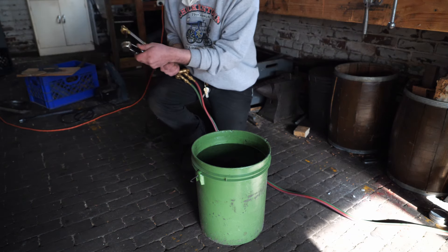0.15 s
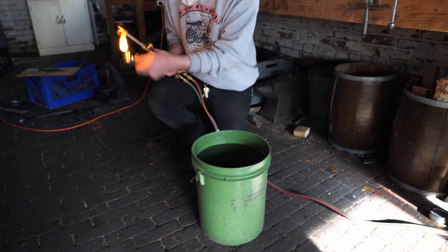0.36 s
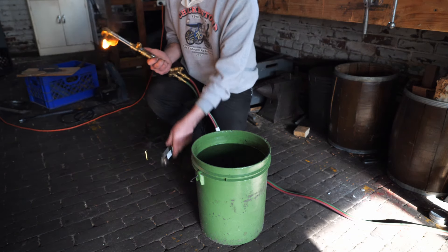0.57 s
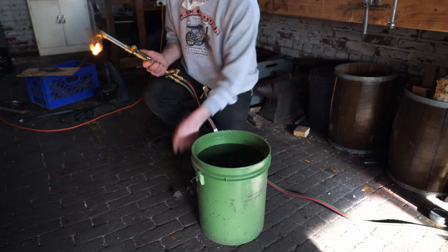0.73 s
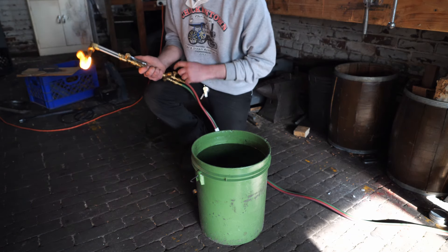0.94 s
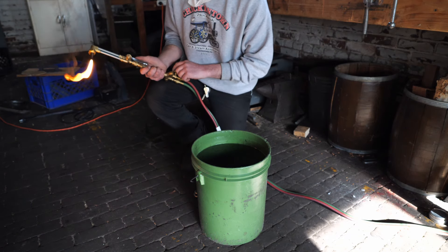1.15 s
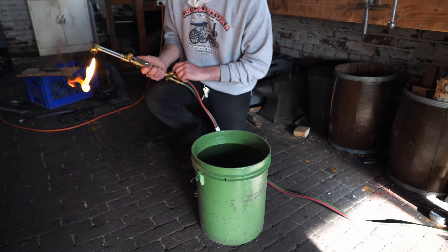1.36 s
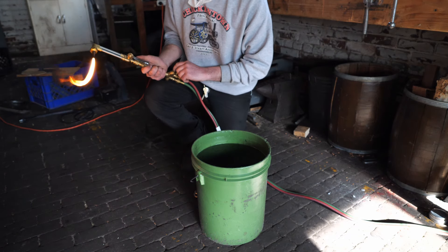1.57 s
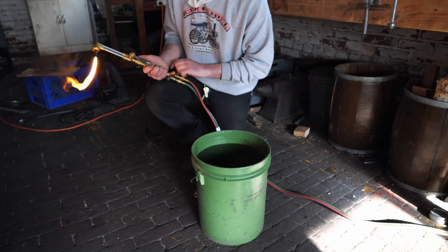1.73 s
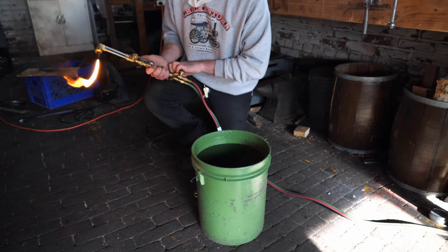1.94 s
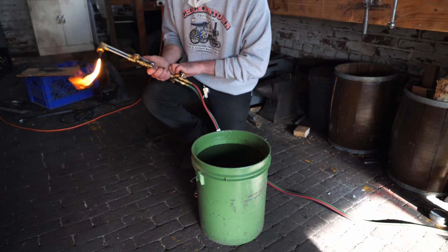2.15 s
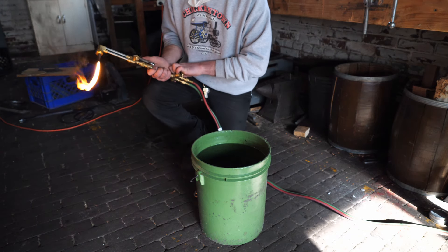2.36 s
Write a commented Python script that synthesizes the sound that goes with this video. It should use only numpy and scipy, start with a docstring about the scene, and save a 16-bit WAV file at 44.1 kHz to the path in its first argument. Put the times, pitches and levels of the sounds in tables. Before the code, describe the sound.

A gas torch lights with one loud, deep pop at about 0.23 seconds, just after a tiny striker scrape, overloading slightly and booming through a brick workshop for over half a second. Small metallic clicks follow near 0.45. At 0.77 the steel striker hits the paving, skids and clatters until about 1.2. Low room hum remains, with a faint short tone near 1.9 and a slight hiss around 2.1.

```python
"""Over a low room hum a spark striker scrapes, then torch gas catches with a deep pop that fills a brick workshop.
The striker clicks, is tossed away, lands on the paving and clatters; the small flame hisses faintly.
Pop: one pressure swing and a noise snap. Striker: ticks and rattles coloured by steel modes.
Walls: decaying stereo noise. Hiss, whistles and hum: shaped noise, plus one clear tone.
The recorder's limiter holds the loudest moments down."""
import sys
import numpy as np
from scipy import signal
from scipy.fft import rfft, irfft
from scipy.io import wavfile

SR = 44100
rng = np.random.default_rng(int(sys.argv[2]) if len(sys.argv) > 2 else 0)


def waveform_to_disk(signal):
    """Save audio, clipped to [-1, 1], as 16-bit WAV at the path in sys.argv[1]."""
    frames = np.transpose(np.atleast_2d(signal))
    scaled = np.clip(frames, -1, 1) * 32767
    samples = np.round(scaled).astype(np.int16)
    wavfile.write(sys.argv[1], SR, samples)


N = 105840
T = np.arange(N) / SR


def amp(db):
    """Level in dB to linear gain."""
    return 10 ** (np.asarray(db) / 20)


def rms_one(x):
    """Scales to RMS 1 over all channels."""
    return x / np.sqrt(np.mean(x ** 2) + 1e-20)


def at_hz(points, hz):
    """Interpolates column 2 of a table over log frequency."""
    points = np.array(points)
    return np.interp(np.log(hz), np.log(points[:, 0]), points[:, 1])


def bin_hz(size):
    """Frequencies of the FFT bins, DC raised to 1 Hz for the log."""
    return np.maximum(np.arange(size // 2 + 1) * SR / size, 1)


def shape(x, spectrum):
    """Filters by a table of dB over Hz, minimum phase so that nothing sounds early."""
    size = x.shape[-1]
    cepstrum = irfft(np.log(amp(at_hz(spectrum, bin_hz(size)))), size)
    # fold the cepstrum onto positive time
    cepstrum[1:size // 2] *= 2
    cepstrum[size // 2 + 1:] = 0
    return irfft(rfft(x) * np.exp(rfft(cepstrum)), size)


def bandpass(x, low_hz, high_hz):
    """Butterworth band filter."""
    return signal.sosfilt(signal.butter(2, [low_hz, high_hz], "band", fs=SR, output="sos"), x)


def stereo_noise(size, likeness):
    """White noise in two channels whose likeness depends on frequency."""
    mid, side = rfft(rng.standard_normal((2, size)))
    alike = np.clip(at_hz(likeness, bin_hz(size)), 0, 1)
    common = np.sqrt(1 + alike) * mid
    opposed = np.sqrt(1 - alike) * side * [[1], [-1]]
    return irfft((common + opposed) / np.sqrt(2), size)


def ring(clicks, hz, t60_s):
    """Two-pole resonator: a unit click sets a sine of height 1 ringing."""
    r = amp(-60 / (t60_s * SR))
    w = 2 * np.pi * hz / SR
    return signal.lfilter([0, np.sin(w)], [1, -2 * r * np.cos(w), r * r], clicks + 1e-18)


POP_S, POP_DB, POP_HZ, POP_SWELL_S = .2344, 3.5, 219, 0.0033
SNAP_S, SNAP_DB, SNAP_LENGTH_S = .2364, -8.5, 0.00019


def pop():
    """The catching gas gives one swelling and dying pressure swing; the flame front snaps."""
    t = np.maximum(T - POP_S, 0)
    swell = t / POP_SWELL_S * np.exp(1 - t / POP_SWELL_S)
    swing = amp(POP_DB) * np.sin(2 * np.pi * POP_HZ * t) * swell
    noise = signal.lfilter([1], [1, -.5], rng.standard_normal(N))
    snap = amp(SNAP_DB) * noise * np.exp(-((T - SNAP_S) / SNAP_LENGTH_S) ** 2)
    return swing + snap


# spectrum of the burning gas: f/Hz, relative level/dB per Hz
BURN_SPECTRUM = [(30, -63), (60, -59.5), (100, -12), (190, 0), (300, -4), (400, -8), (520, -5.5),
                 (640, -10.5), (760, -23.5), (1100, -18.5), (1280, -24.5), (1470, -16.5), (1620, -27),
                 (1850, -29.5), (2300, -17), (2750, -27), (3500, -46), (4350, -28), (5200, -40.5),
                 (7500, -40), (15000, -56)]


def burn_burst():
    """The whole burst of burning as the walls receive it: a coloured click of energy 1."""
    click = 1. * (np.arange(N) == int(POP_S * SR))
    burst = shape(click, BURN_SPECTRUM)
    return burst / np.sqrt(np.sum(burst ** 2))


# striker contacts: t/s, rattle decay/s, relative level/dB in 0.8-2, 2-5.5, 5.5-9.5, 9.5-16 kHz
CONTACTS = [(.1987, .003, -60, -31, -49, -37.5), (.2143, 0.0063, -43.5, -30, -33, -35),
            (0.2309, 0.0049, -13.5, -15.5, -30.5, -34), (.4283, 0.0035, -53, -34, -17.5, -25.5),
            (0.4378, 0.0081, -54, -23.5, -26, -42), (.4636, 0.00035, -46, -12, -30, -4.5),
            (0.473, 0.00049, -46, -43, -48, -39), (.7655, 0.0018, -9.5, -10, -6, -19),
            (0.7716, 0.00092, -25, -32, -15, -28), (0.7796, 0.0013, -29, -30.5, -10, -9.5),
            (0.8335, 0.0062, -17.5, -12.5, -28, -16.5), (0.8774, 0.0011, -19.5, -40, -26, -40),
            (0.956, 0.0057, -31, -19, -57, -48), (1.1062, .012, -38, -24, -29, -33.5),
            (1.1901, 0.0029, -43, -49, -32.5, -45)]
# chatter while sliding: relative level/dB in the same four bands
SKID_BANDS_DB = (-34, -16.5, -20.5, -15)
SKID_S, SKID_LENGTH_S, SKID_FADE_S, SKID_HITS_PER_S = .833, 0.038, .03, 2900
TICK_LAG_S = .0008   # main tick after first touch
SHARP_S = .0015   # contacts that rattle longer have a weaker tick
RATTLE_DB = -5.5   # relative to a full tick


def contact_bands():
    """Each contact is a main tick and a dying rattle; the skid on the bricks is a longer chatter."""
    grains = rng.standard_normal(N) * np.exp(.5 * rng.standard_normal(N)) * (rng.random(N) < .3)
    bands = np.zeros((4, N))
    for start_s, decay_s, *bands_db in CONTACTS:
        decay = (T > start_s) * np.exp(-np.maximum(T - start_s, 0) / decay_s)
        contact = amp(RATTLE_DB) * grains * decay
        contact[int((start_s + TICK_LAG_S) * SR)] = min(1, np.sqrt(SHARP_S / decay_s))
        bands += amp(bands_db)[:, None] * contact
    chatter = rng.standard_normal(N) * (rng.random(N) < SKID_HITS_PER_S / SR)
    sliding = (T > SKID_S) * np.clip((SKID_S + SKID_LENGTH_S - T) / SKID_FADE_S, 0, 1)
    return bands + amp(SKID_BANDS_DB)[:, None] * chatter * sliding


# edges of the thud band and the four contact bands: f/Hz
BAND_EDGES_HZ = (200, 800, 2000, 5500, 9500, 16000)
# steel modes: f/Hz, level above the bare crack/dB, t60/s
STEEL_MODES = [(1220, 8.5, 0.004), (1758, 11.5, 0.043), (2167, 10, 0.022), (3050, 14.5, 0.01),
               (3723, 8.5, .012), (4680, 4.5, .01), (6490, 3.5, 0.012), (6770, 10.5, 0.0062),
               (7670, 15, 0.0035), (7800, 10.5, 0.0016), (8900, 12, 0.011), (11210, 12, 0.003),
               (11500, 4, 0.014), (12800, 5.5, .003), (14200, -4, .006)]
THUD_DB = -4   # drive under 800 Hz, relative to the next band


def striker():
    """Band-limited contacts drive the steel, whose modes are resonance peaks over a flat crack."""
    bands = contact_bands()
    bands = [bands[0] * amp(THUD_DB), *bands]
    drive = np.zeros(N)
    for k, (band, low_hz, high_hz) in enumerate(zip(bands, BAND_EDGES_HZ, BAND_EDGES_HZ[1:])):
        sign = (-1) ** k   # neighbours alternate so that they join without notches
        width_gain = np.sqrt(SR / (high_hz - low_hz)) / np.e
        drive += sign * width_gain * bandpass(band + 1e-18, low_hz, high_hz)
    grid_hz = np.geomspace(100, 20000, 2000)
    power = np.ones(len(grid_hz))
    for hz, db, t60_s in STEEL_MODES:
        power += amp(2 * db) / (1 + ((grid_hz - hz) * t60_s / 1.1) ** 2)
    return shape(drive, np.c_[grid_hz, 10 * np.log10(power)])


# decay time of the workshop: f/Hz, t60/s
ROOM_T60 = [(60, 0.42), (150, 0.7), (400, 0.66), (1000, 0.61), (3000, 0.62), (8000, 0.46), (15000, 0.27)]
# left-right likeness of the reverberation: f/Hz, likeness (0-1)
ROOM_LIKENESS = [(60, 0.99), (180, 1), (550, 0.99), (1650, 0.74), (4970, 0.85), (15000, 0.77)]
ROOM_GAP_S, ROOM_BUILD_S = 0.0019, 0.011


def workshop():
    """Impulse response: noise that builds up after a gap and dies band by band; mean channel energy 1."""
    t = T[:SR]
    edges_hz = 46 * 2 ** np.arange(0, 9, .5)
    white = [stereo_noise(SR, ROOM_LIKENESS) for _ in range(2)]
    response = np.zeros((2, SR))
    for k, (low_hz, high_hz) in enumerate(zip(edges_hz, edges_hz[1:])):
        t60_s = at_hz(ROOM_T60, np.sqrt(low_hz * high_hz))
        response += bandpass(white[k % 2], low_hz, high_hz) * amp(-60 * t / t60_s)
    response *= 1 - np.exp(-np.maximum(t - ROOM_GAP_S, 0) / ROOM_BUILD_S)
    return response / np.sqrt(np.sum(response ** 2) / 2)


# gas jet over time: t/s, level/dB
HISS_LEVEL = [(0, -111), (1.4, -94), (1.95, -76), (2.08, -63.5), (2.25, -72), (2.4, -89)]
# gas jet spectrum: f/Hz, relative level/dB per Hz
JET_SPECTRUM = [(1000, -30.5), (2500, 5), (5000, 5), (9000, 1), (14000, -11)]
# left-right likeness of hiss and hum: f/Hz, likeness (0-1)
BACKGROUND_LIKENESS = [(60, 1.0), (180, 1.0), (550, 0.99), (1650, 0.65), (4970, 0.58), (15000, 0.752)]


def hiss():
    """Gas jet of the small flame: shaped stereo noise under a level curve."""
    jet = rms_one(shape(stereo_noise(N, BACKGROUND_LIKENESS), JET_SPECTRUM))
    return jet * amp(np.interp(T, *np.transpose(HISS_LEVEL)))


# faint whistles: t/s, length/s, f/Hz, width/Hz, level/dB
WHISTLES = [(1.45, .47, 3850, 40, -75), (1.45, .46, 7250, 40, -77), (2.05, .21, 7250, 40, -79)]
TONE_S, TONE_LENGTH_S, TONE_HZ, TONE_DB = 1.81, .16, 1362, -59


def swell(start_s, length_s):
    """Root of a half sine: rises and fades within its length."""
    return np.sin(np.pi * np.clip((T - start_s) / length_s, 0, 1)) ** .5


def whistles():
    """Narrow bands of noise, from two resonators in series, and one short clear tone."""
    out = amp(TONE_DB) * np.sin(2 * np.pi * TONE_HZ * T) * swell(TONE_S, TONE_LENGTH_S)
    for start_s, length_s, hz, width_hz, db in WHISTLES:
        t60_s = 2.2 / width_hz
        narrow = rms_one(ring(ring(rng.standard_normal(N), hz, t60_s), hz, t60_s))
        out += amp(db) * narrow * swell(start_s, length_s)
    return out


# hum spectrum: f/Hz, relative level/dB per Hz
HUM_SPECTRUM = [(18, -79), (30, -56), (106, -2.5), (149, 1.5), (204, -10.5), (239, -6), (328, -19),
                (473, -14), (1160, -16.5), (1350, -18), (1810, -26), (7270, -30), (16000, -41.5)]
HUM_DB = -53.5


def hum():
    """Steady room hum: shaped stereo noise."""
    return amp(HUM_DB) * rms_one(shape(stereo_noise(N, BACKGROUND_LIKENESS), HUM_SPECTRUM))


POP_ROOM_DB, STRIKER_ROOM_DB = 31, 0.5
LEFT_DB, ROOM_LEFT_DB = 2.23, -0.02   # left raised, right lowered by this


def scene():
    """Direct sound, its reverberation and the background, in stereo."""
    steel = striker()
    direct = pop() + steel
    to_walls = amp(POP_ROOM_DB) * burn_burst() + amp(STRIKER_ROOM_DB) * steel
    room = signal.fftconvolve(to_walls[None], workshop(), axes=1)[:, :N]
    direct = direct * amp([[LEFT_DB], [-LEFT_DB]])
    room = room * amp([[ROOM_LEFT_DB], [-ROOM_LEFT_DB]])
    return direct + room + hiss() + whistles() + hum()


LIMIT_DB, RELEASE_DB_PER_S, ATTACK_S = -7, 140, .002
SENSE_S = .002   # averaging time of the level sensor
LOW_CUT_HZ, TOP_CUT_HZ = 76, 16100


def smooth(x, time_s):
    """One-pole lowpass."""
    q = np.exp(-1 / (time_s * SR))
    return signal.lfilter([1 - q], [1, -q], x)


def record(dry):
    """A limiter pulls the gain down fast and lets it climb back; lows are cut, overshoots clip, the top is cut."""
    sensed = np.sqrt(2 * smooth((dry ** 2).max(axis=0), SENSE_S))
    over_db = np.maximum(20 * np.log10(sensed + 1e-9) - LIMIT_DB, 0)
    # peak hold that falls at a constant dB rate
    fall_db = RELEASE_DB_PER_S * T
    held_db = np.maximum(np.maximum.accumulate(over_db + fall_db) - fall_db, 0)
    limited = dry * amp(-smooth(held_db, ATTACK_S))
    low_cut = signal.sosfilt(signal.butter(4, LOW_CUT_HZ, "high", fs=SR, output="sos"), limited)
    clipped = np.clip(low_cut, -1, 1)
    return signal.sosfilt(signal.cheby2(16, 90, TOP_CUT_HZ, fs=SR, output="sos"), clipped)


dry = scene()
out = record(dry)
waveform_to_disk(out)
```